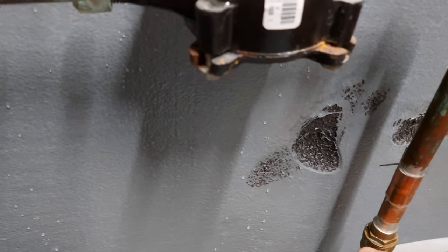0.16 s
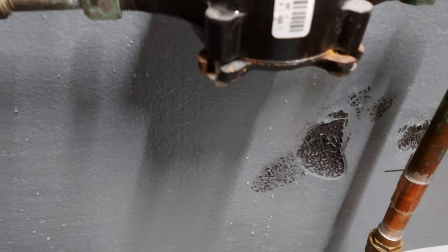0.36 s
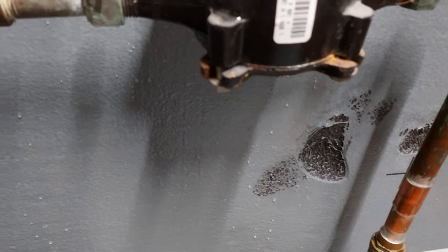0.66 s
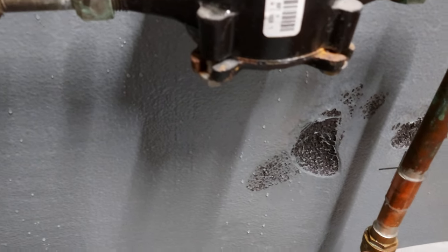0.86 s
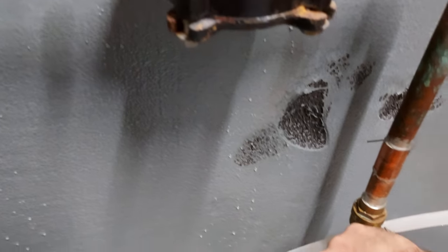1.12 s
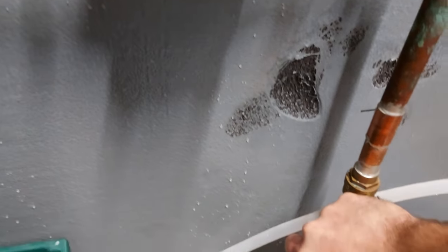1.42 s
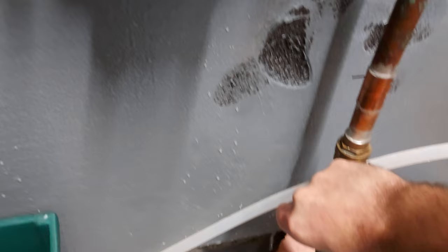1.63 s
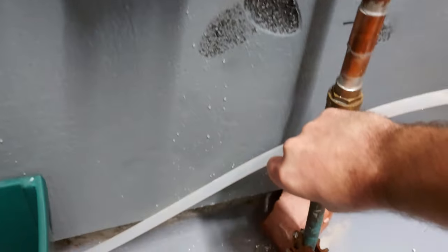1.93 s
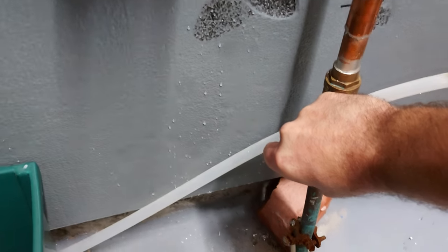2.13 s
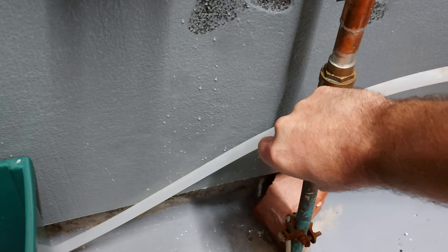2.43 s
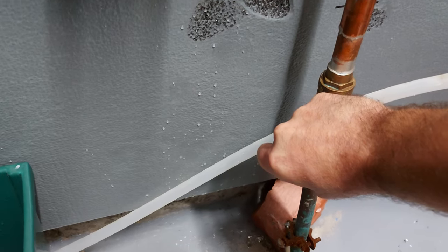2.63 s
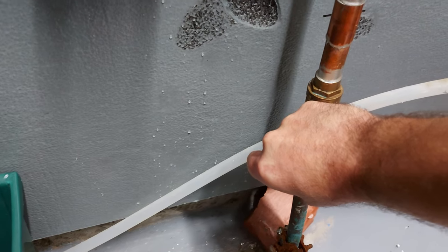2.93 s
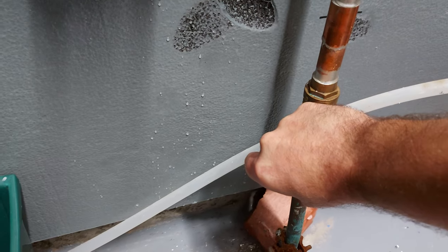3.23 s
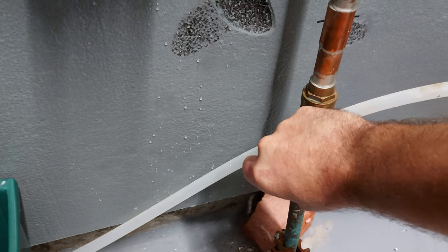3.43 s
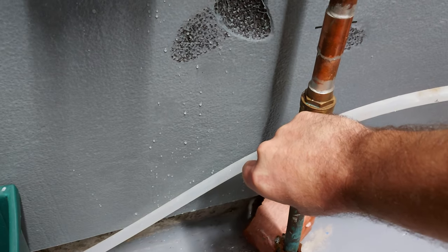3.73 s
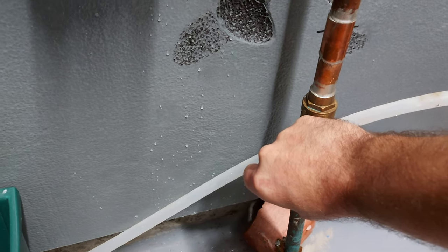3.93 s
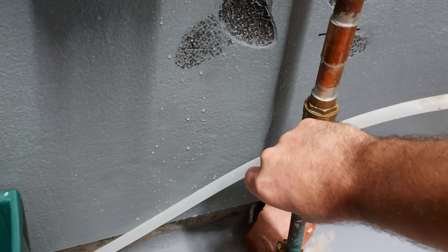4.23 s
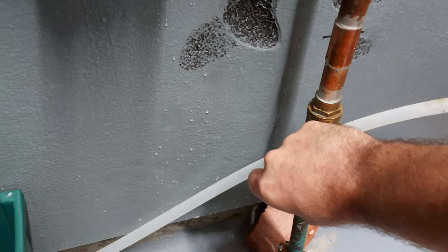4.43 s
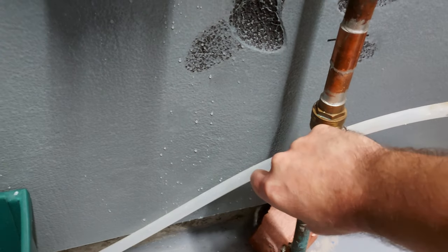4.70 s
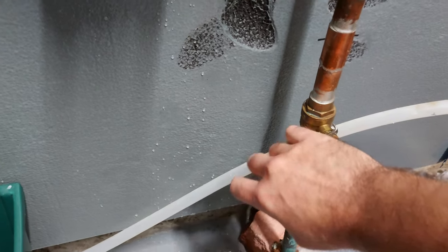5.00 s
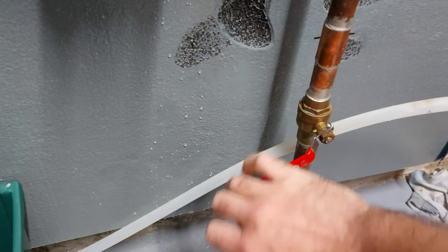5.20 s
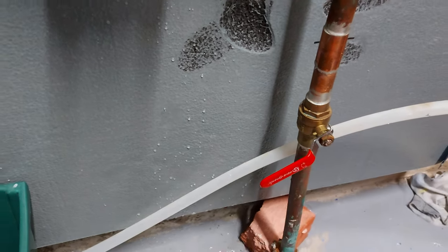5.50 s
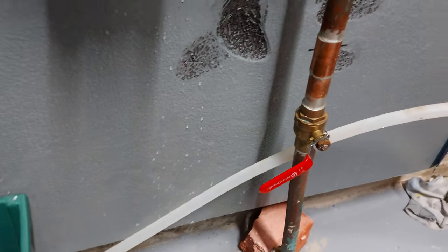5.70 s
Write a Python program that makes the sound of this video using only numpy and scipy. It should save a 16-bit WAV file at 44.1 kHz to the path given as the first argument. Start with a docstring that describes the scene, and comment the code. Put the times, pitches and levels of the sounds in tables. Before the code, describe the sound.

A ball valve on a copper pipe is eased open. Quiet whistling seepage turns suddenly into a loud, fluttering high jet with a metallic squeal, which drops and shatters into rapid sputtering. The microphone, held near, thuds and rumbles as it is lowered. Hissing flow continues with glugs, isolated sharp spits and ringing metal, and finally a wavering whistle fades.

```python
"""Before the valve opens, a leak whistles thinly; the hand-held microphone rumbles and bumps softly as it is lowered.
As the ball valve on a copper water pipe is eased open, a bright jet bursts out: noise shaped by sharp resonances.
The jet breaks up into spits of air, made of short cracks, fizz and ringing, and a steady rush of noise takes over.
Low gurgling noise swells up with short glugs and thumps, and near the end the pipe whistles for a moment."""
import sys
import numpy as np
from scipy import signal
from scipy.fft import irfft, next_fast_len
from scipy.io import wavfile
from scipy.ndimage import map_coordinates

SR = 44100
rng = np.random.default_rng(int(sys.argv[2]) if len(sys.argv) > 2 else 0)


def bounce(signal):
    """Save signal as a 16-bit WAV file at the path given by the first command-line argument."""
    frames = np.transpose(np.atleast_2d(signal))
    limited = np.clip(frames, -1, 1)
    pcm = np.round(limited * 32767).astype(np.int16)
    wavfile.write(sys.argv[1], SR, pcm)


N = 258073
TIME = np.arange(N) / SR   # s
FREQ = np.maximum(np.fft.rfftfreq(next_fast_len(N, True), 1 / SR), 1)   # Hz
SIDES = np.array([[1], [-1]])   # left, right

# resonances of the water column: (f/Hz, width/Hz, level/dB, left minus right/dB)
WATER_MODES = [(213, 5.4, 0.5, 0), (298, 18, -9, -4), (356.5, 8.7, 0, -2.5), (455, 59, -3.5, -5),
               (683, 19, -3.5, 5), (937, 23, -9, -2)]

# the valve: the ball cracks open, the gap grows too wide for a jet, the flow is full
OPENS_S, BREAKS_S, FULL_FLOW_S = 0.828, 1.453, 1.54
JET_T60_S = 4.5   # time the jet takes to fade by 60 dB


def from_db(db):
    """Turn decibels into a gain."""
    return 10 ** (np.asarray(db) / 20)


def rms_one(x):
    """Scale to unit power."""
    return x / np.sqrt(np.mean(x ** 2) + 1e-20)


def panned(db, pan_db):
    """Left and right gains, pan_db apart."""
    return from_db(db + SIDES * pan_db / 2)


def across_hz(points):
    """Give one curve per column, joined on a log-frequency axis."""
    hz, *columns = np.transpose(points)
    return [np.interp(np.log(FREQ), np.log(hz), column) for column in columns]


def drift(rate):
    """Smooth chance with spread 1, changing at about the given rate per second."""
    step, settle = 40, 2000   # samples per slow step, slow steps thrown away at the start
    r = np.exp(-2 * step * np.pi * rate / SR)
    noise = rng.standard_normal(N // step + settle + 2)
    slow = signal.lfilter([1], [1, -2 * r, r * r], noise)[settle:]
    return np.interp(np.arange(N) / step, np.arange(len(slow)), rms_one(slow))


def swell(start, end, attack_s, t60):
    """Envelope: a straight rise from the start, a hold, and a dying away after the end."""
    rise = np.clip((TIME - start) / attack_s, 0, 1)
    return rise * from_db(-60 * np.maximum(TIME - end, 0) / t60)


def hump(centre_s, width_s):
    """Envelope that comes and goes smoothly."""
    return np.exp(-((TIME - centre_s) / width_s) ** 2)


def burst(start, t60, rise):
    """Envelope that rises quickly and dies away."""
    out = np.zeros(N)
    first = max(int(start * SR), 0)
    age = TIME[:min(N - first, int(2 * t60 * SR))]
    out[first:first + len(age)] = (1 - np.exp(-age / rise)) * from_db(-60 * age / t60)
    return out


def sputter(per_s, spread_db, t60):
    """Envelope of random small bursts of uneven size, with unit power."""
    starts = rng.random(N) < per_s / SR
    power = starts * from_db(2 * spread_db * np.clip(rng.standard_normal(N), -2, 2))
    decay = from_db(-60 / (t60 * SR)) ** 2
    return rms_one(np.sqrt(signal.lfilter([1], [1, -decay], power + 1e-18)))


def ring(clicks, hz, t60):
    """A unit click sets a dying sine of starting height 1 ringing."""
    r, w = from_db(-60 / (t60 * SR)), 2 * np.pi * hz / SR
    return signal.lfilter([0, np.sin(w)], [1, -2 * r * np.cos(w), r * r], clicks + 1e-18)


def bubbles(per_s, cycles, low_hz, high_hz, count=18):
    """Bubbles of many sizes, each ringing for some cycles at its own pitch; unit power."""
    clicks = (rng.random(N) < per_s / SR) * rng.uniform(-1.04, 1, N)
    dealt = rng.integers(0, count, N)   # which pitch each click gets
    out = np.zeros(N)
    for k, hz in enumerate(np.geomspace(low_hz, high_hz, count)):
        out += ring(clicks * (dealt == k), hz, cycles / hz) * np.sqrt(low_hz / hz)
    return rms_one(out)


def resonances(modes):
    """Power per frequency and side of a set of steep-sided resonances."""
    return sum(panned(db, pan) ** 2 / (1 + ((FREQ - hz) / width) ** 2) ** 2
               for hz, width, db, pan in modes)


def standing_waves(spacing_hz):
    """A ripple over frequency, from the many weak modes of pipework and room."""
    ripple = rng.standard_normal(SR)
    return np.interp(FREQ / spacing_hz, np.arange(SR), ripple)


def turbulence(colour=(), modes=(), weight=1, ripple_db=4.5):
    """Stereo noise of unit power: a broad colour with resonances standing out, weighted in power."""
    # how the two sides compare: (f/Hz, likeness 0-1, scatter of phase/rad)
    likeness = [(100, 1, .05), (304, 0.85, 0.072), (824, 0.83, 0.43), (2450, 1, 1.27), (4330, 0.9, 1.85),
                (8750, 0, 1.8), (10500, 0.72, 0.45), (14700, 0.7, 2.7)]
    power = resonances(modes)
    if len(colour):
        power = power + panned(*across_hz(colour)) ** 2
    power = weight * power
    mid, side = rng.standard_normal((2, len(FREQ))) + 1j * rng.standard_normal((2, len(FREQ)))
    alike, scatter = across_hz(likeness)
    alike = np.clip(alike, 0, 1)
    pair = np.sqrt(1 + alike) * mid + np.sqrt(1 - alike) * side * SIDES
    if ripple_db:   # wall echoes shift one side against the other and ripple the colour
        pair[0] *= np.exp(1j * scatter * standing_waves(spacing_hz=130.63))
        pair *= from_db(ripple_db * standing_waves(spacing_hz=30))
    return rms_one(irfft(pair * np.sqrt(power))[:, :N])


def wandering(x):
    """Air carried in the water lets all pitches of a sound drift slightly up and down together."""
    share, per_s = 0.004, 9   # share of the pitch, changes per second
    reading = np.cumsum(1 + share * drift(per_s))   # places to read from, in samples
    return np.array([map_coordinates(side, [reading], order=5, mode="mirror") for side in x])


def flow():
    """Strength of the flow: it builds up to 1 when full, then eases as the pipe fills."""
    builds_db_per_s, eases_db_per_s = 19, 0.51
    since = TIME - FULL_FLOW_S
    return from_db(np.minimum(builds_db_per_s * since, -eases_db_per_s * since))


def bumps():
    """Soft bumps set the low modes of the microphone case and grip ringing."""
    # soft bumps on the microphone: (t/s, level/dB, extra level of the upper modes/dB)
    bump_table = [(.36, -44, -21), (0.439, -49, -7), (.55, -46, -13), (.95, -45, -18), (1.243, -37, -2),
                  (1.31, -29.5, -16), (1.376, -30.5, -5.5), (1.446, -29.5, 4), (1.529, -19.5, -10),
                  (1.593, -29, 4), (1.663, -24.5, -10.5), (1.755, -20.5, -14), (1.826, -22.5, -12),
                  (1.887, -21, -18), (1.946, -22, -14), (2.012, -19.5, -35), (2.082, -23.5, -13),
                  (2.149, -25, -23)]
    # low modes of the microphone case and grip: (f/Hz, t60/s, level/dB)
    case_modes = [(90.9, 0.18, 3.5), (99.3, 0.1, -7), (178, 0.1, -1), (203.4, 0.2, 2.5), (270, 0.13, -25),
                  (338, 0.19, -14.5)]
    s, level_db, upper_db = np.transpose(bump_table)
    out = np.zeros(N)
    for hz, t60, mode_db in case_modes:
        pushes = np.zeros(N)
        # sharper bumps reach the upper modes
        pushes[(s * SR).astype(int)] = from_db(level_db + mode_db + (hz > 150) * upper_db)
        # the ringing takes a cycle or two to build
        building = signal.butter(2, [0.93 * hz, 1.53 * hz], "band", fs=SR, output="sos")
        out += signal.sosfilt(building, ring(pushes, hz, t60))
    return out * panned(-5.5, -4.5)


def handling():
    """The hand-held microphone rumbles as it shifts in the hand, and is bumped as it is lowered."""
    # shifts of the microphone in the hand: (start t/s, end t/s, rumble level/dB)
    shifts = [(-.15, 0.225, -49), (0.3, 0.954, -59), (1.154, 2.02, -39.5), (3.07, 3.198, -52.5),
              (3.555, 3.72, -51.5), (4.0, 4.788, -59.5)]
    # broad colour of the rumble: (f/Hz, level per Hz/dB, left minus right/dB)
    rumble_colour = [(20, -23, 0), (48, -14, -9), (67.4, -1, -8), (89.5, 0.5, 2), (118, 0.5, -7),
                     (134.5, -9.5, 3), (220, -10.5, 0.5), (317, -23.5, -7), (590, -61, 13), (1500, -88, 0)]
    grip_db, attack_s, t60_s = -62, 0.22, 1.6
    power = from_db(grip_db) ** 2
    for start, end, db in shifts:
        power = power + (from_db(db) * swell(start, end, attack_s, t60_s)) ** 2
    return bumps() + turbulence(rumble_colour) * np.sqrt(power)


def short_swell(hz):
    """Noise around one pitch, in which the resonances of the water column near it stand out."""
    near = resonances([(hz, 0.1 * hz, 0, 0)])   # width a tenth of the pitch
    fill = [(hz, -23.5, -2)]   # fills in between the resonances
    return turbulence(fill, WATER_MODES, weight=near, ripple_db=3.0)


def gurgling():
    """Low gurgling noise and bubbling swell up and down, with short glugs, thumps and a higher surge."""
    # swells of low gurgling noise, the first goes with the handling of the microphone:
    # (start t/s, end t/s, level/dB)
    gurgle_swells = [(1.3, 1.984, -62.5), (3.007, 4.21, -52.5), (4.287, 5.413, -55)]
    # broad colour of the gurgling: (f/Hz, level per Hz/dB, left minus right/dB)
    gurgle_colour = [(80, -15, 2), (184, -20, -21), (408, -24.5, -1), (600, -10, -12), (755, -15.5, 1),
                     (950, -35, 12), (2500, -60, 10)]
    # short low glugs and thumps, and one higher surge of the jet: (t/s, level/dB, pitch f/Hz)
    short_table = [(0.977, -45, 270), (1.032, -38, 1940), (1.56, -45, 255), (1.997, -40, 259),
                   (2.3, -56.5, 332), (3.189, -47, 412), (3.48, -43.5, 366), (3.61, -42, 824),
                   (3.7, -40, 258), (3.919, -43, 680), (4.119, -41.5, 360), (4.371, -43, 380),
                   (4.724, -39.5, 810), (5.163, -39.5, 864), (5.39, -59, 454)]
    steady_db, attack_s, t60_s = -72.5, 0.56, 1.4
    strength = from_db(steady_db)
    for start, end, db in gurgle_swells:
        strength = strength + from_db(db) * swell(start, end, attack_s, t60_s)
    churn = turbulence(gurgle_colour, WATER_MODES) * sputter(per_s=120, spread_db=5.5, t60=0.17)
    popping = bubbles(per_s=70, cycles=35, low_hz=240, high_hz=820) * panned(-5, -3)
    short = sum(short_swell(hz) * from_db(db) * burst(s, t60=0.31, rise=0.0088)
                for s, db, hz in short_table)
    return (churn + popping) * strength + short


def knocks():
    """A jolt of the water knocks on the copper wall and sets its modes ringing."""
    # knocks on the pipe wall: (t/s, level/dB, t60/s)
    knock_table = [(.829, -37, .17), (2.7998, -42, .07), (5.7, -48, .04)]
    # resonances of the knocked wall: (f/Hz, width/Hz, level/dB, left minus right/dB)
    knock_modes = [(1390, 110, -9, 0), (1700, 83, -2, 4), (2160, 150, 2, 0), (2650, 290, 0, -2),
                   (3330, 230, 6, -4)]
    strength = sum(from_db(db) * burst(s, t60, rise=0.00037) for s, db, t60 in knock_table)
    return turbulence(modes=knock_modes) * strength


def wall_ringing():
    """The leak, the jet and the flow keep the copper wall ringing, unsteadily and with a late swell."""
    # resonances of the copper wall: (f/Hz, width/Hz, level/dB, left minus right/dB)
    wall_modes = [(680, 12, -16, 0), (951, 25, -5, 3), (1040.7, 26.6, 2, 0), (1253, 31, -4.5, 5),
                  (1350, 81, -18, 13), (1620, 12, -11.5, -2), (1769, 30, 0, 6), (1890, 22, -3.5, 1)]
    leak_db, flow_db, jet_db, swell_db = -59, -53, -51, -49.5
    wall = turbulence(modes=wall_modes) * np.hypot(from_db(leak_db), from_db(flow_db) * flow())
    # the jet and the late swell ring mostly the lowest wall modes
    by_jet = from_db(jet_db) * swell(OPENS_S, BREAKS_S, attack_s=0.2, t60=JET_T60_S)
    late = from_db(swell_db) * hump(centre_s=5.59, width_s=0.28)
    low_wall = turbulence(modes=wall_modes, weight=1 / FREQ ** 2) * np.hypot(by_jet, late)
    return (wall + low_wall) * from_db(0.8 * drift(8))


def whistle():
    """The nearly full pipe whistles for a moment: fluttering noise in narrow, wandering resonances."""
    # resonances of the whistle: (f/Hz, width/Hz, level/dB, left minus right/dB)
    whistle_modes = [(2720, 130, -9, 0), (3080, 70, -8, 2), (3385, 50, 3.5, 5), (4040, 70, -6, 0),
                     (4545, 35, -3, -3), (5590, 60, -3, -3), (5920, 25, -7, -3), (6930, 50, -11, -3),
                     (8200, 90, -11, -6)]
    strength = from_db(-51) * swell(start=4.76, end=5.68, attack_s=0.13, t60=1.9)
    flutter = from_db(1.5 * drift(12))
    return wandering(turbulence(modes=whistle_modes)) * strength * flutter


def leak():
    """Water squeezing past the ball whistles thinly, and dies away once the valve opens."""
    # broad colour of the leak: (f/Hz, level per Hz/dB, left minus right/dB)
    leak_colour = [(30.3, -49, -2), (500, -41, 1), (780, -15, 4), (1530, -64, -3), (2020, -16, 1),
                   (3000, -15.5, 4), (4740, -12, -1), (6000, -18, -1), (6400, -33, 0), (8070, -17.5, -13),
                   (10100, -36, -12), (10400, -21.5, 3), (16100, -28, -7)]
    # resonances of the leak: (f/Hz, width/Hz, level/dB, left minus right/dB)
    leak_modes = [(1034, 28, -1, 0), (2073, 32, -8, 3), (2800, 35, -11, -5), (3328, 148, -9, 2),
                  (4028, 143, -4, 1), (5176, 50, 2, -4), (5676, 108, -10, -3), (6253, 109, -8, -5),
                  (6420, 45, -7, -14), (8087, 84, -14, -14), (11371, 51, -17, 5)]
    start_db, t60_s = -46.5, 4.2
    # the leak steps up as the hand presses on the lever
    press_s, press_takes_s, press_db = 0.37, 0.25, 3
    step_db = press_db * np.clip((TIME - press_s) / press_takes_s, 0, 1)
    fade_db = 60 * np.maximum(TIME - OPENS_S, 0) / t60_s
    return turbulence(leak_colour, leak_modes) * from_db(start_db + step_db - fade_db)


def singing():
    """The flow sings unsteadily around one pitch, as noise in two close, wandering resonances."""
    # resonances of the singing: (f/Hz, width/Hz, level/dB, left minus right/dB)
    singing_modes = [(5188, 30, 0, -4), (5240, 36, -4, -4)]
    stutter = from_db(2.5 * drift(14))
    return wandering(turbulence(modes=singing_modes)) * flow() * from_db(-52) * stutter


def rush():
    """Turbulent flow hisses, with a slightly wavering level."""
    # broad colour of the rush: (f/Hz, level per Hz/dB, left minus right/dB)
    rush_colour = [(200, -32, -5), (580, -20, 6.5), (1240, -23, -25), (1570, -16.5, 3), (1980, -13.5, 1),
                   (2640, -16, -0.5), (2850, -24.5, 2), (3700, -11, 3.5), (4150, -9, -5),
                   (4750, -16.5, -11), (5360, -6.5, -4), (6370, -15, -1.5), (6700, -19, -11),
                   (8000, -19, -14.5), (9200, -17, 2), (9600, -25.5, 2)]
    # resonances of the rush: (f/Hz, width/Hz, level/dB, left minus right/dB)
    rush_modes = [(2600, 70, -11, 0), (2720, 150, -9, 0), (3370, 70, -14, 4), (3860, 70, -8, -3),
                  (4040, 70, -9, -3), (4310, 110, -7, -7), (4490, 70, -9, -6), (4760, 130, -6, -7),
                  (5060, 60, -6, -4), (5145, 45, -3, -4), (5330, 110, -9, -4), (5578, 45, -6, -6),
                  (5870, 50, -10, -5), (6090, 50, -7, -6), (6200, 55, -7, -6), (6930, 55, -11, -5),
                  (7220, 150, -14, -6), (8070, 120, -19, -10), (10560, 110, -15, 2), (14484, 55, -13, -5),
                  (15000, 110, -11, -7)]
    level_db, waver_db = -41, 1.1
    hiss = turbulence(rush_colour, rush_modes, ripple_db=3.7)
    return hiss * flow() * from_db(level_db + waver_db * drift(20))


def spits():
    """Air pockets burst through the valve: strong spits over a sputtering spray with droplet ticks."""
    # the strongest spits of air through the valve: (t/s, level/dB, t60/s)
    spit_table = [(0.06, -31.5, .05), (0.068, -33.5, .04), (0.471, -41, .05), (1.501, -27, .07),
                  (1.588, -23.5, .12), (1.609, -24, .1), (1.625, -24.5, .06), (1.679, -23, .08),
                  (1.724, -23, .08), (1.771, -20.5, .1), (1.829, -26, .06), (1.870, -22, .11),
                  (1.939, -26, .22), (1.972, -25, .06), (2.005, -22.5, .06), (2.022, -25, .05),
                  (2.05, -24, .06), (2.083, -23, .06), (2.105, -26.5, .05), (2.121, -22, .09),
                  (2.145, -22, .07), (2.179, -24, .07), (2.224, -25, .07), (2.2854, -22.5, .12),
                  (2.3015, -24, .06), (2.321, -24, .07), (2.395, -23, .05), (2.4166, -24.5, .05),
                  (2.4275, -27, .05), (2.4805, -23.5, .05), (2.506, -25.5, .045), (2.525, -26.5, .04),
                  (2.608, -24.5, .04), (2.621, -25.5, .04), (2.632, -26, .04), (2.6496, -24.5, .06),
                  (2.6724, -27, .045), (2.7103, -27.5, .05), (2.746, -28, .04), (2.758, -27, .06),
                  (2.7873, -27, .04), (2.7998, -19, .075), (2.8527, -28.5, .05), (2.872, -25, .09),
                  (2.891, -28, .04), (2.9534, -26.5, .05), (2.9943, -17.5, .02), (3.008, -30, .04),
                  (3.026, -29, .05), (3.0574, -30, .025), (3.0708, -31, .04), (3.093, -23.5, .055),
                  (3.1535, -25, .05), (3.194, -27, .04), (3.2404, -28, .03), (3.285, -28, .03),
                  (3.3635, -27, .06), (3.406, -32, .08), (3.598, -33.5, .03), (3.6205, -25, .05),
                  (3.7075, -24.5, .04), (3.7225, -22, .07), (3.887, -25, .045), (3.9555, -34, .04),
                  (3.9786, -28.5, .03), (4.029, -26.5, .05), (4.0668, -27, .025), (4.133, -22, .05),
                  (4.1608, -31.5, .03), (4.257, -32.5, .04), (4.458, -24, .05), (4.5047, -30, .025),
                  (4.585, -29.5, .03), (4.6133, -33.5, .04), (4.6628, -31, .045), (4.7148, -20, .045),
                  (4.8863, -35, .03), (5.7436, -23, .05)]
    # broad colour of the fizz: (f/Hz, level per Hz/dB, left minus right/dB)
    spit_colour = [(1480, -46, -19), (3780, -7.5, -1), (5730, -10, -11), (7000, -19.5, -5),
                   (7400, -11.5, -10), (8340, -16.5, -5), (9350, -9, -4), (9550, -22, -4),
                   (10400, -10.5, 5), (12200, -9.5, -2), (13400, -8, 0), (13900, -15.5, -9),
                   (16400, -11, -13.5)]
    # resonances of the valve body: (f/Hz, width/Hz, level/dB, left minus right/dB)
    spit_modes = [(7230, 60, -12, -6), (8070, 130, -14, -10), (9150, 130, -12, -9), (9834, 25, -8, 3),
                  (10680, 220, -13, 4), (11353, 25, -9, -5), (12400, 200, -13, -4), (14095, 65, 1, -8),
                  (14484, 55, -4, -5), (14975, 65, 2, -7), (15110, 100, -3, -9)]
    # an even mist comes from the jet and from the open valve; parts of the spray add in power
    mist_jet = from_db(-40) * swell(OPENS_S, BREAKS_S, attack_s=0.76, t60=0.82)
    mist = mist_jet ** 2 + (from_db(-47.5) * flow()) ** 2
    # the sputter dies away as the air is flushed out
    air = (from_db(-41) * swell(BREAKS_S, end=1.66, attack_s=0.55, t60=3.6)) ** 2
    # a spit starts with a short crack, then fizzes away while the valve body rings a little longer
    crack_db, tail_db, ring_db = -8.5, -15, -11   # against the level in the table
    hardening, middling_db = 0.3, -25   # extra dB per dB above a middling spit
    cracks, tails, rings = np.zeros((3, N))
    for s, db, t60 in spit_table:
        # stronger spits crack and fizz more, weak ones mostly ring
        hard_db = db + hardening * (db - middling_db)
        cracks += (from_db(hard_db + crack_db) * burst(s, t60=0.012, rise=0.0001)) ** 2
        tails += (from_db(hard_db + tail_db) * burst(s, t60, rise=0.0004)) ** 2
        rings += (from_db(db + ring_db) * burst(s, t60 * 1.07, rise=0.0003)) ** 2
    # small bursts fizz broadly or ring the valve body, each kind at its own moments
    fizzing = air * sputter(per_s=85, spread_db=3.5, t60=0.04) ** 2
    ringing = air * sputter(per_s=75, spread_db=3.5, t60=0.05) ** 2
    # droplets only tick, each with one of many pitches
    droplets = bubbles(per_s=150, cycles=150, low_hz=7000, high_hz=15000, count=30) * panned(-3.5, -4)
    fizz = turbulence(spit_colour) * np.sqrt(mist + fizzing + cracks + tails) * from_db(2.0)
    chirr = turbulence(modes=spit_modes) * np.sqrt(ringing + rings) * from_db(3.0)
    return fizz + chirr + droplets * np.sqrt(air)


def jet_strength():
    """The jet starts at once, sags, drops as it breaks up in the wider gap, then fades."""
    sag_db_per_s, drop_db, drop_takes_s = 4.5, 6.5, 0.03
    sagged_db = sag_db_per_s * np.clip(TIME - OPENS_S, 0, BREAKS_S - OPENS_S)
    dropped_db = drop_db * np.clip((TIME - BREAKS_S) / drop_takes_s, 0, 1)
    return swell(OPENS_S, BREAKS_S, attack_s=0.0027, t60=JET_T60_S) * from_db(-sagged_db - dropped_db)


def shriek():
    """The shriek of the jet, flickering noise in narrow resonances, lingers as the hiss drops."""
    # resonances of the shriek: (f/Hz, width/Hz, level/dB, left minus right/dB)
    shriek_modes = [(5190, 45, -6, -4), (5575, 35, -9, -8), (6215, 45, -4, -7), (6350, 50, 0, -6),
                    (6410, 40, -1, -11)]
    flicker = from_db(2 * drift(25))
    strength = from_db(-39.5) * swell(OPENS_S, end=1.63, attack_s=0.039, t60=1.1)
    return turbulence(modes=shriek_modes, ripple_db=2) * flicker * strength


def jet():
    """Water cavitates in the barely open valve: a fluttering hiss, its lower part surging unevenly."""
    # broad colour of the jet: (f/Hz, level per Hz/dB, left minus right/dB)
    jet_colour = [(700, -31, -1), (1420, -33, -5), (2000, -27, 1), (2590, -11.5, 1), (4100, -10.5, 2.5),
                  (5950, -21, -3), (6950, -16.5, -10), (7900, -10, -12), (8600, -16, -17), (9450, -14.5, 5),
                  (11440, -5, 0), (12300, -11, 0), (14200, -10, -2), (16000, -9.5, -3)]
    # resonances of the jet: (f/Hz, width/Hz, level/dB, left minus right/dB)
    jet_modes = [(1034, 26, -9, 0), (1762, 30, -12, 3), (2035, 90, -12, 3), (2800, 110, -11, 0),
                 (3298, 74, -15, 8), (3980, 170, -12, 1), (5166, 55, 1, -6), (5572, 45, -3, -8),
                 (6215, 40, -3, -7), (6300, 22, 2, -3), (8050, 75, 0, -12), (8170, 90, -9, -14),
                 (11130, 103, -11, 8), (11335, 100, -6, 0), (11850, 100, -12, 0), (12640, 70, -14, -14),
                 (14090, 60, -3, 0), (14487, 45, 1, -3), (15030, 150, -2, -5), (15180, 130, -4, -10)]
    level_db = -27.5
    flutter_db = 1.5 * drift(45)
    surge_db = 1.5 * drift(24) - 0.5
    hiss = turbulence(jet_colour, jet_modes, ripple_db=2)
    below = signal.butter(3, 4500, fs=SR, output="sos")
    body = signal.sosfiltfilt(below, hiss)   # the lower part, kept in step with the hiss
    surging = hiss - body + body * from_db(surge_db)
    return surging * jet_strength() * from_db(level_db + flutter_db) + shriek()


def scene():
    """The handling of the microphone, the gurgling, and the sounds of the pipe and its valve together."""
    background = handling() + gurgling() + knocks() + wall_ringing() + whistle()
    return background + leak() + singing() + rush() + spits() + jet()


def record(dry):
    """The microphone loses the deep bass, and the top is cut steeply."""
    bass_cut_hz, top_cut_hz = 58, 15750
    thin = signal.sosfilt(signal.butter(2, bass_cut_hz, "high", fs=SR, output="sos"), dry)
    return signal.sosfilt(signal.ellip(12, 0.1, 80, top_cut_hz, fs=SR, output="sos"), thin)


dry = scene()
out = record(dry)
bounce(out)
```